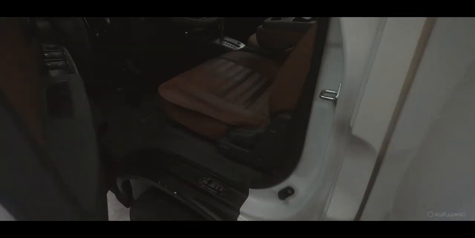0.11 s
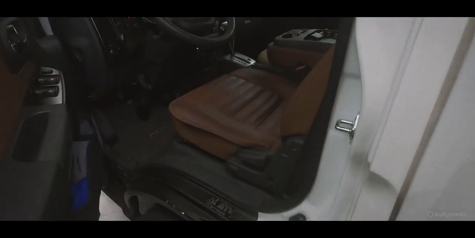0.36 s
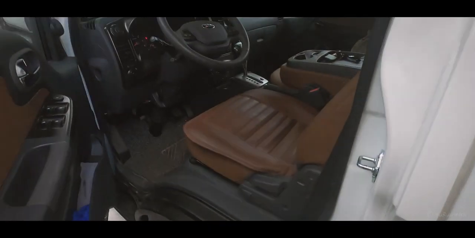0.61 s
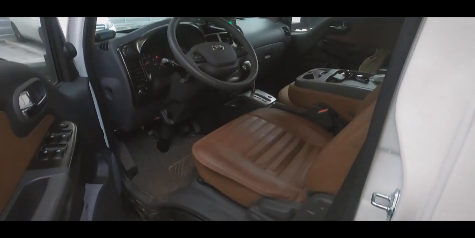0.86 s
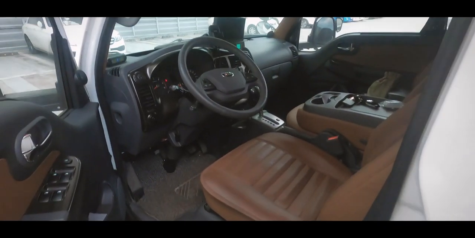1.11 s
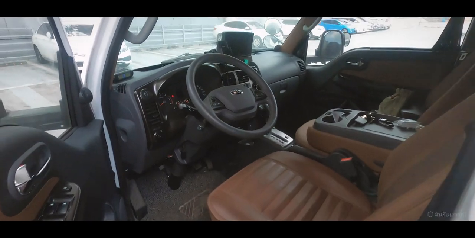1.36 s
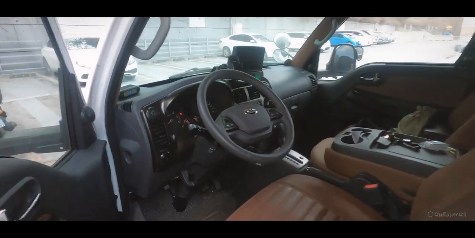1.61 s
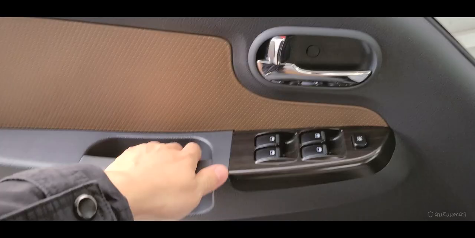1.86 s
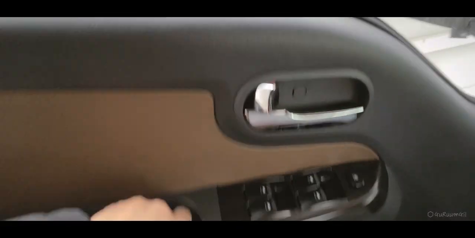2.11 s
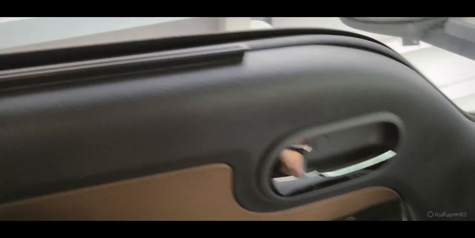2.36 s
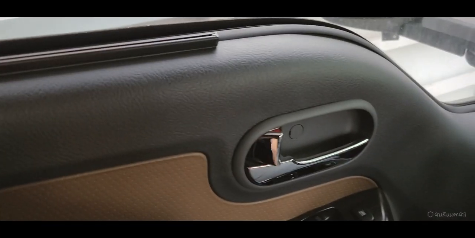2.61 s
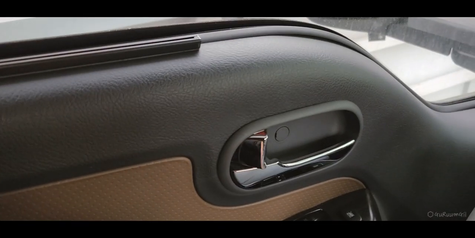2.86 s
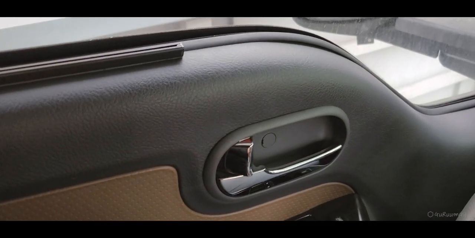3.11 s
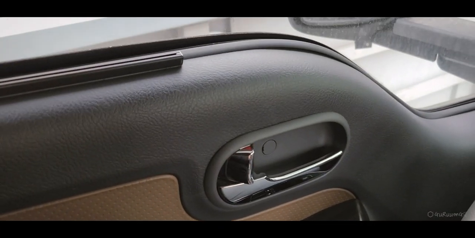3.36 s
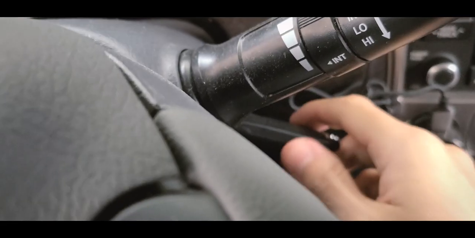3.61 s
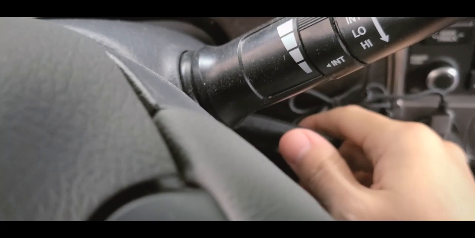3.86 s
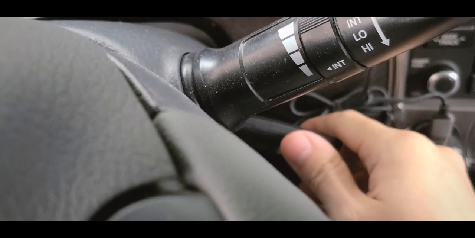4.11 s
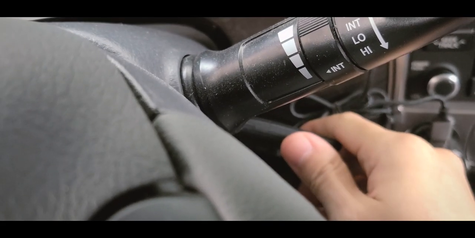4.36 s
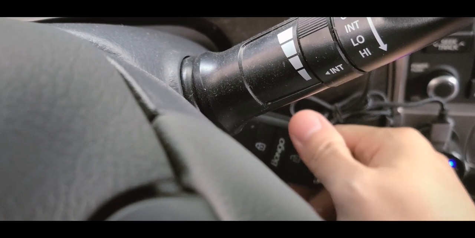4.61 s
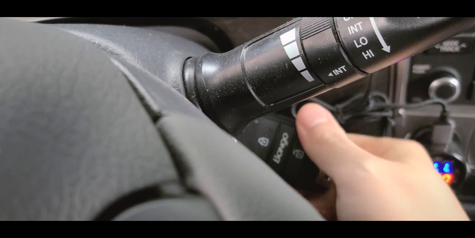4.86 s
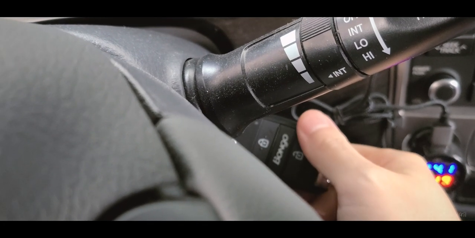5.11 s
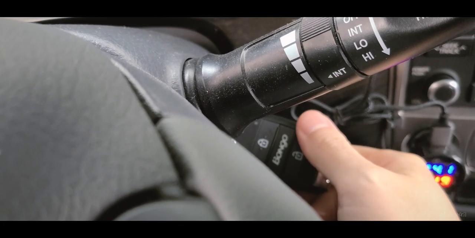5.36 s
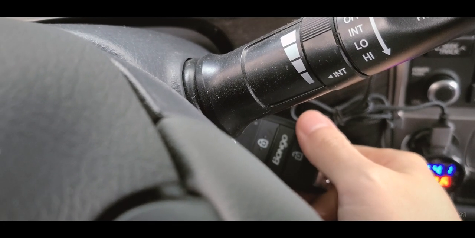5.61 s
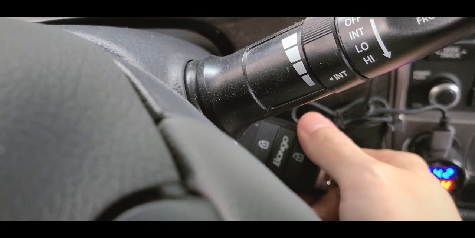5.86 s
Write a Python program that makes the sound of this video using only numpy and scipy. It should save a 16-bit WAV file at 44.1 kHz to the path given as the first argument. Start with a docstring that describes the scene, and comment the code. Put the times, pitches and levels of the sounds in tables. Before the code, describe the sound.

For the first two seconds the microphone is outdoors beside an open truck in a parking lot: steady low traffic rumble, soft road noise and gentle sleeve rustle. A dull, hollow panel knock comes around 0.27 s, with only faint taps after it. At about 1.9 s the place changes to the door, with duller road noise and closer, brighter fabric. Around 2.3 s small knocks lead straight into a hard slam at 2.37 s: metal latch, heavy thud and a deep shuddering boom, fading over most of a second with tiny trim rattles. The outside is now strongly muffled; fabric stirs near 3 s. From 3.5 s, close to the steering column, come faint squeaks, light key taps and a click at 3.75 s. Two firm clicks land at 4.58 and 4.72 s, then a short motor hum sinks in pitch. A smaller click at 5.33 s precedes soft gear whirr, slow ticks and another faint hum.

```python
"""Beside the open door of a small truck in a parking lot: traffic rumble, a knock, rustling sleeves.
Then, inside, the door is pulled shut hard: latch, thud, rattling trim and a long boom of the cab.
Last a key goes in and turns; relays click and small motors hum behind the dashboard.
Impacts are grainy noise bursts shaped by spectra and modes; hollow parts, cab and motors are sums of
sines; traffic, hand movement, fabric and gear whirr are random short-time spectra."""
import sys
import numpy as np
from scipy import signal
from scipy.fft import rfft, irfft
from scipy.io import wavfile
from scipy.ndimage import uniform_filter1d

SR = 44100
rng = np.random.default_rng(int(sys.argv[2]) if len(sys.argv) > 2 else 0)


def materialize(psi):
    """Save the field psi as 16-bit PCM at rate SR to the path in sys.argv[1].

    A 1-D psi becomes a single channel; in a 2-D psi each row is a channel.
    """
    bounded = np.clip(np.atleast_2d(psi).T, -1, 1)
    quanta = np.round(bounded * 32767).astype(np.int16)
    wavfile.write(sys.argv[1], SR, quanta)


def field_ratio(decibels):
    """Amplitude ratio for a level in dB (20 dB per decade); scalars and array-likes work."""
    return 10 ** (np.asarray(decibels, dtype=float) / 20)


N = 264592

# The microphone starts outdoors, then moves to the door, the shut cab and the steering column: t/s
STEP_IN_S, SHUT_S, KEY_VIEW_S = 1.915, 2.45, 3.455

# Hits: t/s, nominal body level/dB, nominal treble level/dB, favoured f/Hz
LATCH_HITS = [(2.326, -21.5, -12.5, 1500), (2.368, -5, -29.5, 1051), (2.372, -10.5, -20.5, 2900),
              (2.376, -12.5, -27.5, 1900), (2.381, -6.5, -27, 379), (2.387, -7.5, -25, 1200)]  # metal catch and door edge strike home
DOOR_HITS = [(2.301, -30.5, -42.5, 895), (2.316, -44, -33.5, 4500), (2.345, -30, -28, 5500),
             (2.4, -15, -20, 12500), (2.42, -12.5, -21, 12500), (2.435, -18, -46, 2500),
             (2.451, -16.5, -33, 800), (2.479, -23.5, -37.5, 6500), (2.517, -42, -48, 1200),
             (2.53, -40.5, -53.5, 4900)]  # smaller door knocks just before the thud, then the door settling after it
TRIM_HITS = [(2.565, -48.5, -51, 6800), (2.59, -47.5, -75, 1150), (2.629, -79.5, -53, 6800),
             (2.695, -72, -59.5, 6460), (2.745, -70, -56.5, 6660)]  # loose trim rattles out
KNOCK_HITS = [(0.045, -48, -46, 2580), (0.172, -43, -51, 1210), (0.265, -22, -26, 3800),
              (0.277, -19.5, -42, 820), (0.289, -29.5, -41.5, 1230), (0.52, -59, -67, 1050),
              (0.703, -41.5, -71, 921)]  # knock outdoors
KEY_HITS = [(3.526, -47, -59, 790), (3.536, -43, -48, 600), (3.688, -49, -68, 778),
            (3.717, -39.5, -60, 1063), (3.743, -40, -62, 821), (3.751, -28.5, -70, 1280),
            (3.757, -26, -48, 1860), (3.897, -78, -55, 7500), (4.422, -69, -60, 9000),
            (4.465, -30, -41, 1120), (4.484, -43, -84, 557), (4.524, -57, -42.5, 1500),
            (4.585, -14.5, -23.5, 1040), (4.715, -28, -33, 1200), (4.724, -13.5, -19.5, 1260),
            (4.781, -48, -53, 1100), (4.822, -54, -60, 490), (5.333, -30, -39.5, 4000),
            (5.378, -48.5, -84, 650)]  # key and relays
KEY_SLIDES = [(3.457, -56, -59.5, 703), (4.563, -48, -59, 1810), (4.702, -40, -56, 800),
              (5.255, -49.5, -89, 860), (5.285, -60, -87, 1200)]  # the key drags in the lock

# Spectra of the hits: f/Hz, relative level per Hz/dB
DOOR_COLOUR = [(76, -31.5), (130, -2), (230, -1), (356, -2), (491, -10), (613, -3.5), (1200, -8.5),
               (1970, -19.5), (2770, -20), (4300, -26.5), (6200, -24), (7800, -33.5), (9500, -39.5),
               (12500, -34.5), (15300, -35.5), (16000, -50.5)]
KNOCK_COLOUR = [(150, -42), (250, -3.5), (502, -14.5), (1040, -11.5), (2410, -18.5), (3600, -25.5),
                (7260, -35), (12000, -94), (15600, -113), (22000, -120)]
KEY_COLOUR = [(120, -22), (200, -47.5), (394, -13), (1320, 0.5), (1620, -9), (2560, -7.5), (3760, -6.5),
              (6050, -9), (8900, -23), (13600, -21.5), (16000, -26)]

# Low modes of the cab shell: f/Hz, relative level/dB, relative extra decay/(dB/s), left-right level/dB
CAB_MODES = [(18.96, 0, -7.5, -0.5), (23.86, -9.5, -16, -2), (28.06, -8, -4.5, 1.5), (36.6, 0, 9, 0),
             (38.78, -4.5, 17, -3.5), (50.9, 2.5, 38, -1), (59.2, -9, 34, 4.5), (72.3, 0.5, 40, -2.5),
             (86.3, 3, 40, 0.5), (106, -8.5, 44.5, -3), (112, -22, -3.5, 2.5), (124.5, -13, 25, -2),
             (152.1, -13, 35.5, -2.5), (184, -20, 45, 2.5), (223, -23, 71.5, -2)]

# Modes: f/Hz, relative level/dB, t60/s
COLUMN_MODES = [(420, -24, 0.038), (608, 0, 0.14), (820, 20, 0.052), (1040, 14, 0.019), (1270, -4, 0.07),
                (2033, 15.5, 0.043), (2580, -5, 0.06), (3184, -8, 0.073)]  # steering column
PANEL_MODES = [(105, 3.5, 0.068), (190, -0.5, 0.13), (238, -5, 0.094), (1270, -2, 0.064), (1505, 1, .04),
               (3780, -6, 0.021)]  # hollow outer panel
LOCK_MODES = [(401, -2, .06), (645, 2, 0.092), (825, -1, 0.032), (1060, 6, 0.04), (1270, -25, 0.03),
              (1350, -29, .2), (1580, -20, 0.089), (1820, -13, 0.18), (2100, -24, 0.12), (2620, 3, 0.054),
              (2900, -25, .14), (3330, -22, 0.16), (4100, -26, .32)]  # barrel and springs
DASH_MODES = [(89, -2.5, .29), (227, -3, 0.14), (249, -8, 0.16)]  # hollow dashboard

# Blows on those modes: t/s, relative level/dB, f/Hz that the contact favours
PANEL_BLOWS = [(.165, -18.5, 100), (.174, -38, 1270), (.232, -18, 105), (.266, -11.5, 2290),
               (.268, -14.5, 186), (0.296, -12, 185), (.315, -14.5, 197)]
LOCK_BLOWS = [(4.564, -48, 1820), (4.588, -23.5, 1730), (4.726, -26.5, 1200), (4.733, -30, 4300),
              (4.78, -53, 1096), (5.333, -35, 850)]
DASH_BLOWS = [(4.59, -33.5, 89), (4.735, -34, 89), (5.279, -44.5, 249), (5.329, -39.5, 225),
              (5.38, -35.5, 227)]

# Small motors that slow as they run: start t/s, length/s, first f/Hz, last f/Hz, rms level of the hum/dB
MOTOR_RUNS = [(4.864, 0.215, 273.5, 223.4, -59.5), (5.52, .43, 192.7, 179, -62)]
# Gear whirr of a small motor: f/Hz, relative level per Hz/dB
WHIRR_COLOUR = [(300, -39.5), (560, -7), (800, -14.5), (1000, -3.5), (1200, -1.5), (1500, -21.5),
                (3000, -69)]
# Thin upward squeaks, perhaps the seat cover: start t/s, length/s, first f/Hz, last f/Hz, peak level/dB
SQUEAKS = [(3.35, .1, 6900, 7650, -74), (3.37, .06, 6050, 6500, -75), (3.36, .11, 9250, 9900, -78),
           (3.39, .07, 12900, 13300, -77), (3.41, .05, 14800, 15200, -82), (4.35, .1, 7900, 8350, -77)]

# Spectra of fabric and traffic: f/Hz, relative level per Hz/dB
RUSTLE_OUTDOORS = [(880, -29), (1500, -9), (2590, -12.5), (2830, -13), (7100, -15.5), (8570, -31.5),
                   (13500, -34), (14500, -33.5), (16000, -59.5)]
RUSTLE_AT_DOOR = [(240, -33.5), (400, -14), (474, -5.5), (528, -10.5), (636, -17.5), (865, -9),
                  (1350, -13.5), (2020, -10), (2930, -12.5), (6440, -8.5), (9180, -23.5), (12900, -11.5),
                  (16000, -24)]
RUSTLE_AT_COLUMN = [(880, -39), (1500, -2), (1560, -13.5), (2160, -0.5), (5330, -14), (7100, 0.5),
                    (9190, -28.5), (11900, -13.5), (16000, -22.5)]
RUMBLE_OUTDOORS = [(8.8, -39.5), (15, -8), (43, 2), (220, -20), (290, -51), (480, -120)]
RUMBLE_IN_CAB = [(8.8, -29), (15, -0.5), (27, -5.5), (59, -6), (72, -9.5), (81, -17.5), (112, -15),
                 (140, -27.5), (220, -29.5), (290, -58), (480, -120)]  # through the cab walls
ROAD_OUTDOORS = [(59, -24.5), (100, -1), (157, -12), (282, -9), (367, -17.5), (514, -20), (736, -21),
                 (922, -16.5), (994, -19.5), (1420, -26), (2280, -37), (7050, -48), (9000, -63.5),
                 (11700, -87), (19800, -120)]
ROAD_FROM_STEP = [(59, -40), (100, -7.5), (140, -18), (233, -9.5), (266, -13.5), (657, -22), (872, -22.5),
                  (976, -20.5), (1340, -23), (7050, -34.5), (9000, -57), (11700, -71.5), (19800, -120)]  # duller road noise, from the step to the door onward

# Resting level at each place of the microphone: from t/s, level/dB
RUSTLE_REST = [(0, -76), (STEP_IN_S, -50.5), (SHUT_S, -73.5), (KEY_VIEW_S, -76.5)]
RUMBLE_REST = [(0, -40), (STEP_IN_S, -43), (SHUT_S, -53)]
ROAD_REST = [(0, -42.5), (STEP_IN_S, -50.5), (SHUT_S, -70.5)]

# Swells, added to the resting power: middle t/s, peak level/dB, half length/s
RUSTLE_SWELLS = [(.2, -59, 0.34), (.525, -58.5, 0.048), (.705, -62, .015), (1.25, -56.5, 0.1),
                 (1.51, -59, 0.084), (1.77, -55.5, 0.14), (2.29, -49.5, 0.072), (2.52, -58, 0.087),
                 (2.722, -65, 0.095), (2.95, -57, 0.19), (3.129, -54.5, 0.14), (3.47, -65, 0.35),
                 (3.85, -75, 0.56), (4.4, -77.5, 0.04), (4.64, -73, .08)]  # sleeve and seat fabric near the microphone
RUMBLE_SWELLS = [(.2, -36.5, 0.17), (.38, -35.5, 0.36), (1.09, -39, 0.29), (1.735, -32.5, 0.086),
                 (2.336, -33.5, .045), (2.844, -42, 0.38), (4.803, -42.5, 0.11), (5.7, -51.5, .4)]
MUFFLED_SWELLS = [(2.58, -56.5, .09), (3.64, -63.5, 0.25), (4.549, -62.5, 0.24), (4.85, -67, 0.15),
                  (5.3, -66.5, 0.062), (5.97, -68, 0.11)]  # low, muffled swells of noise, mostly hand movement in the cab

# Left-right likeness of diffuse sound: f/Hz, correlation from -1 to 1
LIKENESS_OUTDOORS = [(60, 0.88), (180, 0.93), (550, 0.62), (1650, 0.8), (4970, 0.07), (15000, 0.048)]
LIKENESS_IN_CAB = [(60, 0.99), (180, 0.41), (550, 0.17), (1650, -0.41), (4970, -0.23), (15000, 0.69)]
# Stereo balance of hits inside the cab: f/Hz, left-right level/dB
CAB_LEAN = [(60, -2.5), (120, -1.5), (240, -1), (480, 0.5), (950, -1), (1890, -2), (3770, -5), (7520, -6.5),
            (15000, -7.5)]


def hits(kinds, colour, modes, ring_db, split_hz, treble_speed, grain_db, crack_db, tone_db, lag_s, alike, lean):
    """Impact as filtered noise: uneven tiny contacts reach the right port late and partly scattered."""
    mix, t = np.zeros((2, N)), np.arange(16384) / SR
    hz = np.fft.rfftfreq(len(t), 1 / SR)
    treble_share = 1 / (1 + (split_hz / (hz + 1)) ** 4)
    shape = field_ratio(read(colour, hz))
    ring = 0 * t
    for f, db, t60 in modes:
        ring = ring + field_ratio(db - 60 * t / t60) * np.sin(2 * np.pi * f * t)
    ring = rfft(ring)
    body_shape = shape * (1 - treble_share) + field_ratio(ring_db) * ring / (abs(ring).max() + 1e-9)
    balance = field_ratio(lean * read(CAB_LEAN, hz) * np.array([[.5], [-.5]]))
    ports = balance * np.exp(-2j * np.pi * hz * lag_s * np.array([[0], [1]]))
    fade = signal.windows.tukey(len(t), .04)
    lead_s = .01  # room for the filters
    after = np.maximum(t - lead_s, 0)
    for rows, (rise, t60) in kinds:
        for s, body_db, treble_db, tone_hz in rows:
            # the struck part favours one broad resonance
            tone = 1 + field_ratio(tone_db) / (1 + 1j * 7 * (hz - tone_hz) / tone_hz)
            direct, scattered, grains = rng.standard_normal((len(t), 3)).T
            grains = field_ratio(grain_db * evened(uniform_filter1d(grains, size=40)))
            body = (body_db, body_shape * tone, 1, alike[0])
            treble = (treble_db, shape * treble_share * tone, treble_speed, alike[1])
            for db, form, speed, same in (body, treble):
                envelope = (1 - np.exp(-after / rise)) ** 2 * field_ratio(-60 * speed * after / t60) * grains
                envelope *= 1 + field_ratio(crack_db - 60 * after / 0.006)  # the first contact is the hardest
                right = same * direct + np.sqrt(1 - same ** 2) * scattered
                burst = envelope * np.array([direct, right])
                scale = np.sqrt(np.mean(abs(form) ** 2))
                sound = field_ratio(db) / scale * fade * irfft(rfft(burst) * form * ports)
                add(mix, s - lead_s - rise, sound)
    return mix


def door():
    """Chained impact: latch, door and trim each have their own rise constant/s and t60/s."""
    kinds = [(LATCH_HITS, (.001, .056)), (DOOR_HITS, (.0023, .1)), (TRIM_HITS, (0.00057, 0.1))]
    return hits(kinds, DOOR_COLOUR, [], -60, split_hz=2370, treble_speed=1.02, grain_db=1.5, crack_db=-1.0,
                tone_db=5.0, lag_s=.0005, alike=(.8, .5), lean=1)


def boom():
    """Modal superposition: low modes of cab shell and air start together and beat at unequal decays."""
    start_s, level_db, rise_s, hold_s = 2.362, -8, 0.037, .1
    drop_db, drop_s, fade_db_per_s = 9.5, 0.028, 53  # the seal closes: a quick drop, then a long fade
    t = np.arange(SR) / SR
    side = np.array([[.5], [-.5]])
    modes, power = 0, 0
    for k, (hz, db, fall, pan_db) in enumerate(CAB_MODES):
        sign = (-1) ** k  # neighbouring modes move in opposite sense
        wave = np.sin(2 * np.pi * hz * (t - .01 + 0.0008 * side))
        modes = modes + sign * field_ratio(db - fall * t + pan_db * side) * wave
        power = power + field_ratio(db - fall * t) ** 2 / 2
    late = np.maximum(t - rise_s - hold_s, 0)
    db = level_db - drop_db * (1 - np.exp(-late / drop_s)) - fade_db_per_s * late
    envelope = np.minimum(t / rise_s, 1) ** 0.96 * field_ratio(db)
    mix = np.zeros((2, N))
    add(mix, start_s, envelope * modes / np.sqrt(power) * signal.windows.tukey(len(t), .02))
    return mix


def knocks():
    """Impact outdoors: short noise bursts, nearly alike at both ports."""
    return hits([(KNOCK_HITS, (0.0023, 0.064))], KNOCK_COLOUR, [], -60, split_hz=2020, treble_speed=0.99,
                grain_db=3.5, crack_db=-1, tone_db=-5, lag_s=.00005, alike=(.85, .6), lean=0)


def keys():
    """Coupled resonance: key, relay and slow gear contacts excite the modes of the steering column."""
    gear_ticks = [(5.452 + k * 0.12, -56, -93, 600) for k in range(5)]  # columns as the other hits
    kinds = [(KEY_HITS + gear_ticks, (.0031, 0.065)), (KEY_SLIDES, (0.0055, 0.24))]
    return hits(kinds, KEY_COLOUR, COLUMN_MODES, ring_db=0.0, split_hz=2030, treble_speed=0.97, grain_db=3.0,
                crack_db=-4.5, tone_db=0.0, lag_s=0.000364, alike=(.8, .6), lean=1.0)


def hollow_parts():
    """Selective modal excitation: a blow wakes the modes near the pitch that its contact favours."""
    off_favour_db_per_octave = 13.5
    mix, t = np.zeros((2, N)), np.arange(SR // 2) / SR
    delay_s = np.array([[0], [.00008]])  # later at the right port
    for modes, blows in (PANEL_MODES, PANEL_BLOWS), (LOCK_MODES, LOCK_BLOWS), (DASH_MODES, DASH_BLOWS):
        hz, db, t60 = np.transpose(modes)[:, :, None, None]
        build_up = 1 - np.exp(-t * hz / 0.77)  # about one cycle
        rings = field_ratio(db - 60 * t / t60) * build_up * np.sin(2 * np.pi * hz * (t - delay_s))
        for s, blow_db, favour_hz in blows:
            gain = field_ratio(blow_db - off_favour_db_per_octave * abs(np.log2(hz / favour_hz)))
            add(mix, s, (gain * rings).sum(0))
    return mix


def motors():
    """Rotation orders: hum at shaft speed with a weak third order, plus a fluttering gear whirr."""
    whirr_s, start_db, settled_db, settle_s = 5.36, -68.5, -75.5, .3
    since = np.arange(N) / SR - whirr_s
    whirr_db = settled_db + (start_db - settled_db) * np.exp(-abs(since) / settle_s)
    whirr_db = np.where(since < 0, -120, whirr_db)
    mix = diffuse_noise(whirr_db, [(0, WHIRR_COLOUR, LIKENESS_IN_CAB)], patchy_db=2.5, flicker_db=4.5,
                        lean_db=-2.0)
    for s, length, first_hz, last_hz, db in MOTOR_RUNS:
        t = np.arange(0, length, 1 / SR)
        shaft_hz = first_hz + (last_hz - first_hz) * t / length
        phase = 2 * np.pi * np.cumsum(shaft_hz) / SR + np.array([[0], [.7]])
        hum = np.sqrt(2) * (np.sin(phase) + field_ratio(-22.0) * np.sin(3 * phase))
        add(mix, s, field_ratio(db) * hum * signal.windows.tukey(len(t), .4))
    return mix


def squeaks():
    """Frequency glide: short faint whistles whose pitch rises fast at first."""
    mix = np.zeros((2, N))
    for s, length, first_hz, last_hz, db in SQUEAKS:
        t = np.arange(0, length, 1 / SR)
        hz = first_hz + (last_hz - first_hz) * np.sin(np.pi / 2 * t / length)
        phase = 2 * np.pi * np.cumsum(hz) / SR + np.array([[0], [.8]])
        add(mix, s, field_ratio(db) * np.sin(phase) * np.hanning(len(t)))
    return mix


def rustle():
    """Friction noise: fine fabric hiss, its treble nearly unrelated at the two ports outdoors."""
    places = [(0, RUSTLE_OUTDOORS, LIKENESS_OUTDOORS), (STEP_IN_S, RUSTLE_AT_DOOR, LIKENESS_IN_CAB),
              (KEY_VIEW_S, RUSTLE_AT_COLUMN, LIKENESS_IN_CAB)]
    return diffuse_noise(swelling(RUSTLE_REST, RUSTLE_SWELLS), places, patchy_db=2.0, flicker_db=-1.2,
                         lean_db=-1.5, size=512)


def traffic_and_muffled_stirs():
    """Broadband noise: rumble and road noise, duller near and in the cab, with muffled swells there."""
    rumble_places = [(0, RUMBLE_OUTDOORS, LIKENESS_OUTDOORS), (SHUT_S, RUMBLE_IN_CAB, LIKENESS_IN_CAB)]
    rumble = diffuse_noise(swelling(RUMBLE_REST, RUMBLE_SWELLS), rumble_places, patchy_db=3.0,
                           flicker_db=-0.56, lean_db=-1.0, size=4096)
    road_places = [(0, ROAD_OUTDOORS, LIKENESS_OUTDOORS), (STEP_IN_S, ROAD_FROM_STEP, LIKENESS_IN_CAB)]
    road_and_stirs = diffuse_noise(swelling(ROAD_REST, MUFFLED_SWELLS), road_places, patchy_db=1.5,
                                   flicker_db=1.0, lean_db=-0.5)
    return rumble + road_and_stirs


def diffuse_noise(level_db, places, patchy_db, flicker_db, lean_db, size=1024):
    """Partly coherent field: random short-time spectra; colour and likeness switch with the place."""
    hop = size // 4
    frames, hz = N // hop + 5, np.fft.rfftfreq(size, 1 / SR)
    t = np.arange(frames) * hop / SR
    a, b, c, d, patches = rng.standard_normal((frames, len(hz), 5)).T
    patches = uniform_filter1d(patches, size=10, axis=0)  # over frequency
    patches = evened(uniform_filter1d(patches, size=10, axis=1))  # over time
    flicker = rng.standard_normal(frames)
    gain, same = np.zeros(a.shape), np.zeros(a.shape)
    for start, colour, likeness in places:
        shape = field_ratio(read(colour, hz))
        gain[:, t >= start] = (shape / np.linalg.norm(shape))[:, None]
        same[:, t >= start] = np.clip(read(likeness, hz), -1, 1)[:, None]
    left = a + 1j * b
    right = same * left + np.sqrt(1 - same ** 2) * (c + 1j * d)
    balance = field_ratio(lean_db * np.array([.5, -.5]))[:, None, None]
    spectra = np.array([left, right]) * balance * gain * field_ratio(patchy_db * patches + flicker_db * flicker)
    noise = signal.istft(spectra, nperseg=size, noverlap=size - hop)[1][:, :N]
    return field_ratio(level_db) * evened(noise)


def swelling(rest, swells):
    """Addition of powers: resting level/dB plus bell-shaped swells, each only at the place of its peak."""
    t = np.arange(0, N + 200, 200) / SR
    start, db = np.transpose(rest)
    place = np.searchsorted(start, t, "right")
    power = field_ratio(db[place - 1]) ** 2
    for s, peak_db, half in swells:
        here = place == np.searchsorted(start, s, "right")
        power = power + here * field_ratio(peak_db) ** 2 * np.exp(-((t - s) / half) ** 2 * 2)
    return np.interp(np.arange(N) / SR, t, 10 * np.log10(power))


def evened(x):
    """Normalisation to unit rms."""
    return x / np.sqrt(np.mean(x ** 2) + 1e-20)


def read(points, hz):
    """Linear interpolation of a table on a logarithmic frequency axis."""
    f, value = np.transpose(points)
    return np.interp(np.log(hz + 1), np.log(f + 1), value)


def add(mix, s, sound):
    """Superposition: adds a sound to the mix at time s."""
    part = mix[:, round(s * SR):][:, :sound.shape[-1]]
    part += sound[..., :part.shape[1]]


def scene():
    """Superposition of all sources, from the door to the background."""
    impacts = door() + boom() + knocks() + keys() + hollow_parts()
    return impacts + motors() + squeaks() + rustle() + traffic_and_muffled_stirs()


def top_cut(x):
    """Nothing passes above the cut-off."""
    return signal.sosfilt(signal.butter(12, 16680, fs=SR, output="sos"), x)


def record(dry):
    """Saturation and band limit: the loudest swings overload softly, then a low-pass cuts the treble."""
    ceiling, edge_hz = .8, 15800
    limited = ceiling * np.tanh(dry / ceiling)
    low_pass = signal.firwin(511, edge_hz, window=("kaiser", 9), fs=SR)
    finished = signal.oaconvolve(limited, low_pass[None], "same")
    return top_cut(finished)


dry = scene()
out = record(dry)
materialize(out)
```